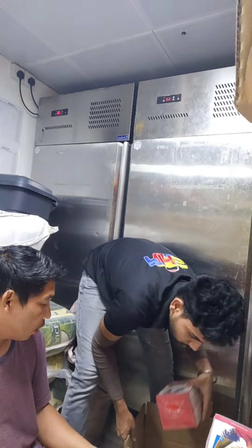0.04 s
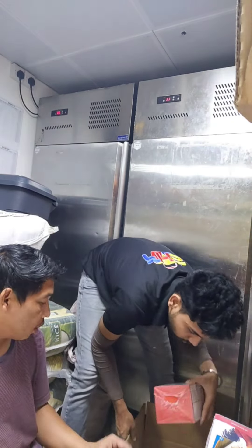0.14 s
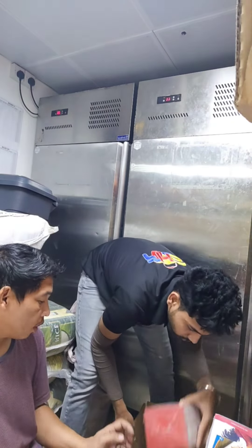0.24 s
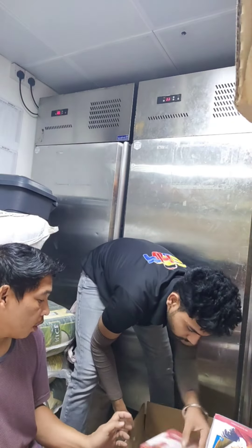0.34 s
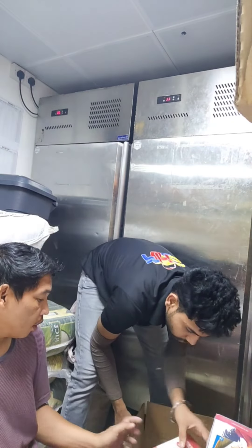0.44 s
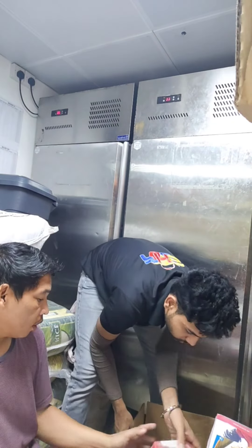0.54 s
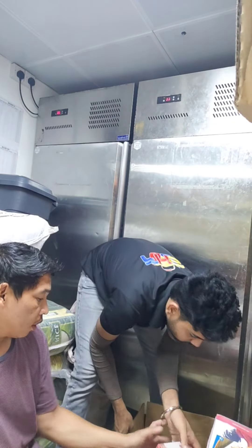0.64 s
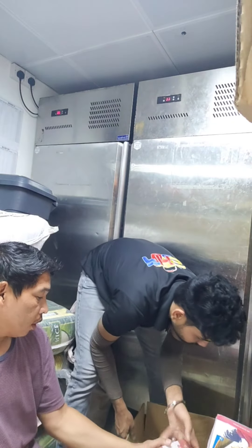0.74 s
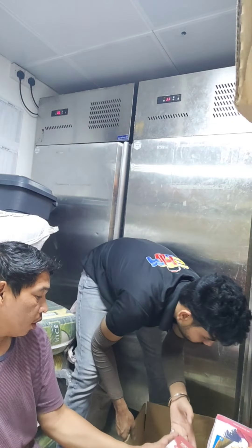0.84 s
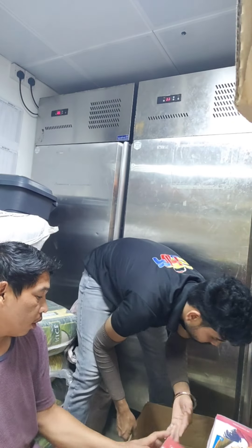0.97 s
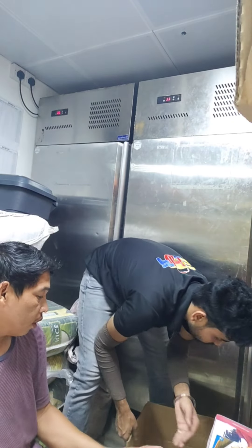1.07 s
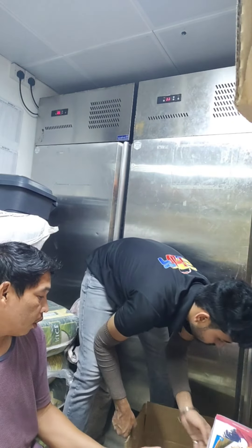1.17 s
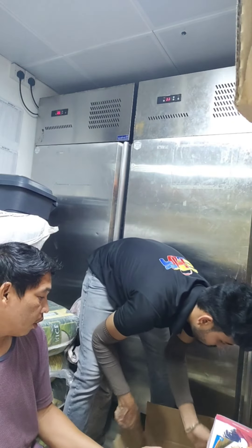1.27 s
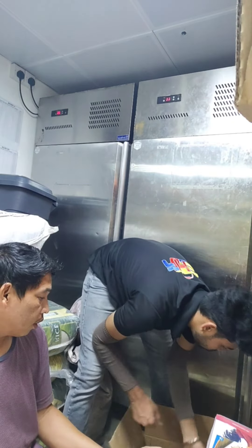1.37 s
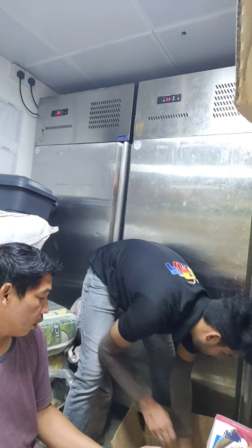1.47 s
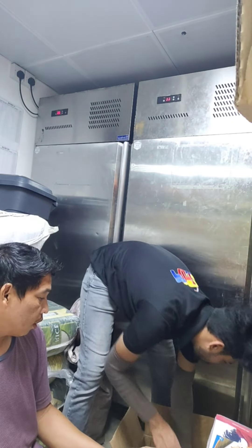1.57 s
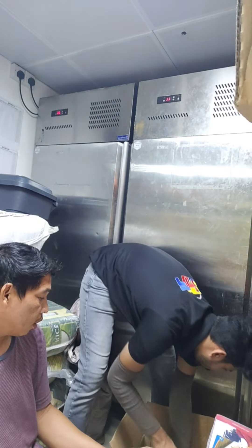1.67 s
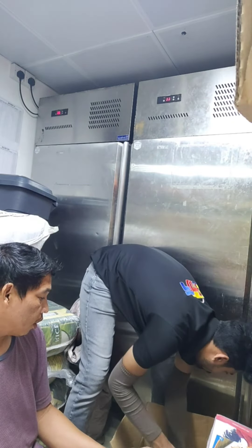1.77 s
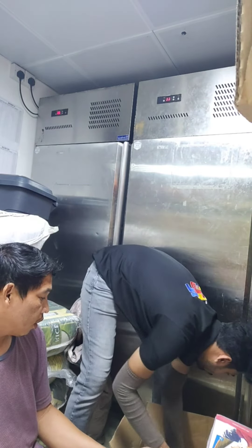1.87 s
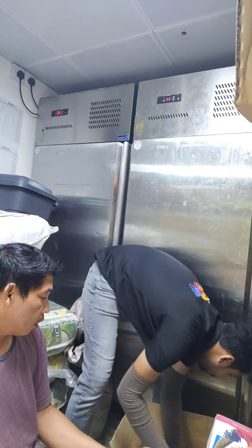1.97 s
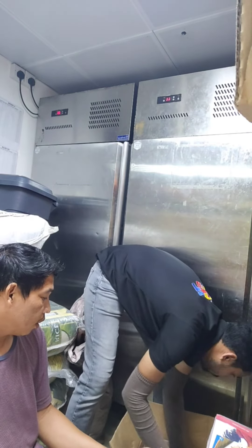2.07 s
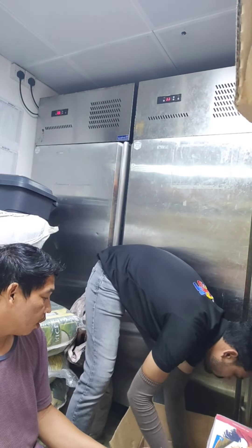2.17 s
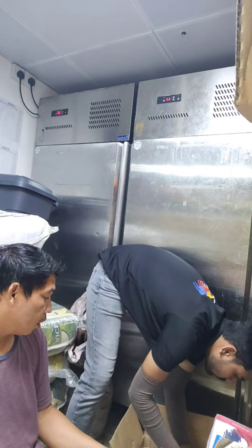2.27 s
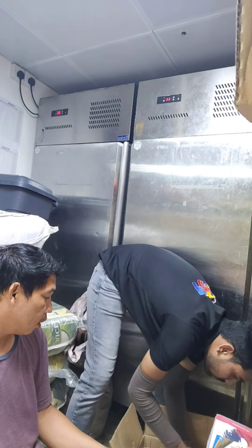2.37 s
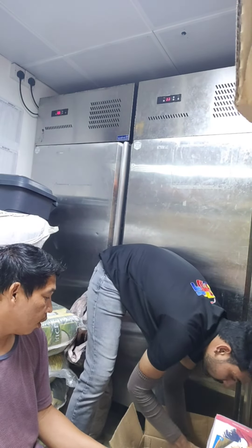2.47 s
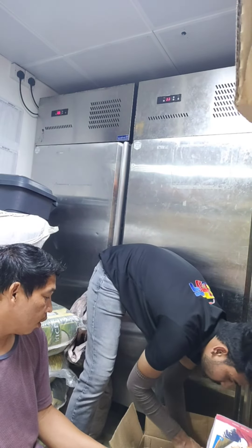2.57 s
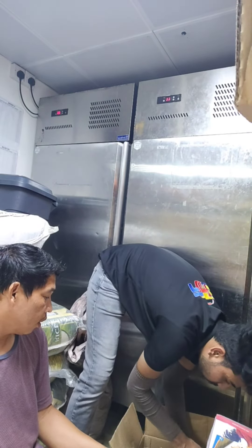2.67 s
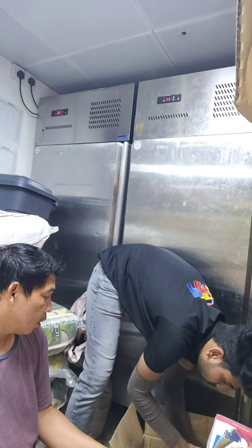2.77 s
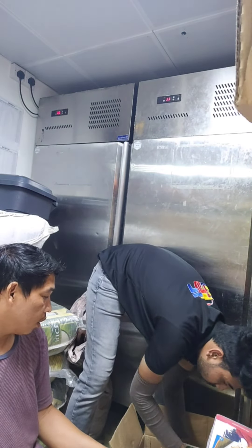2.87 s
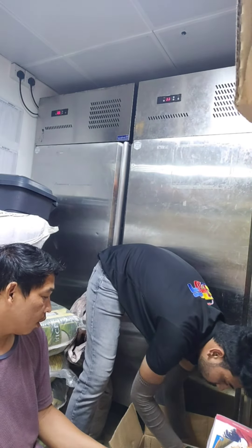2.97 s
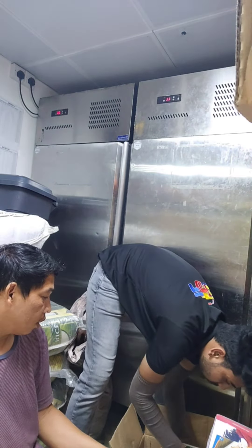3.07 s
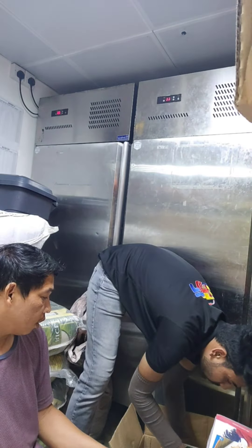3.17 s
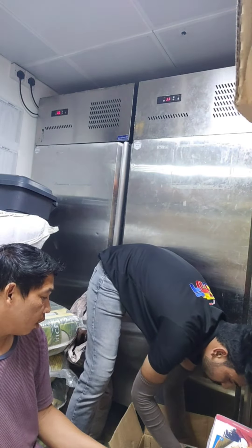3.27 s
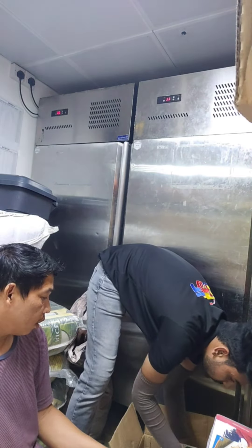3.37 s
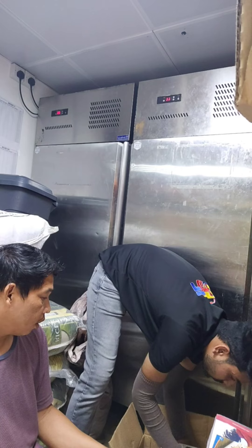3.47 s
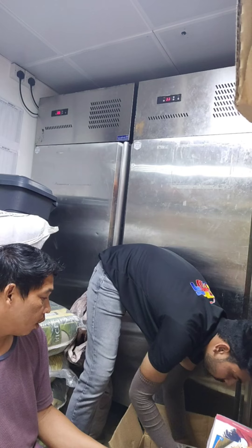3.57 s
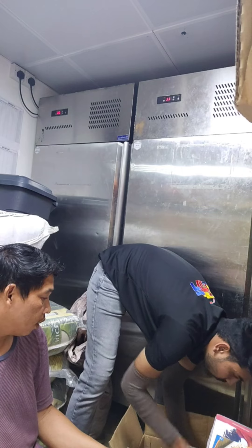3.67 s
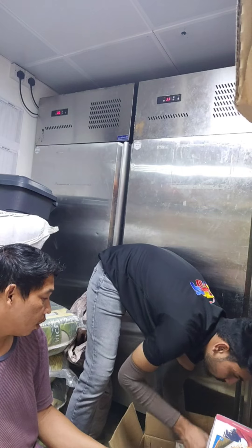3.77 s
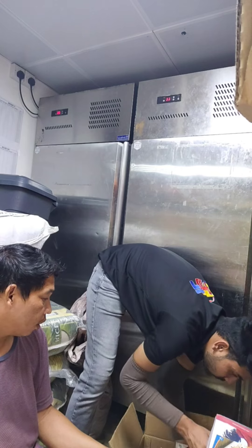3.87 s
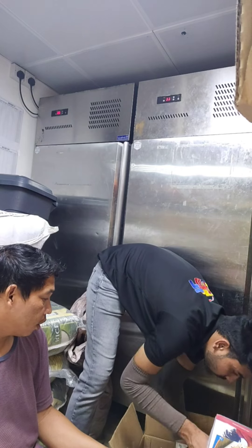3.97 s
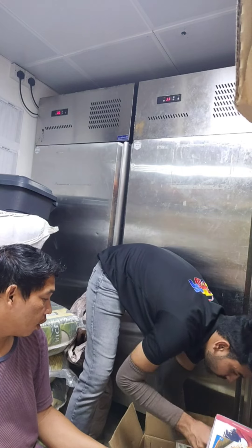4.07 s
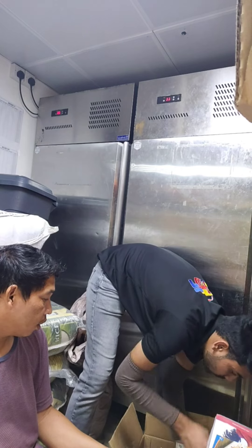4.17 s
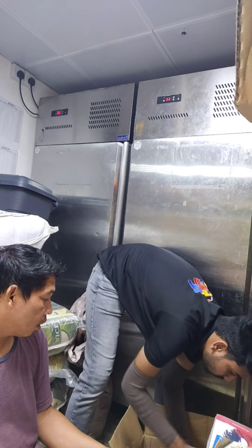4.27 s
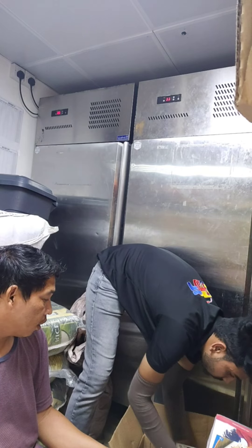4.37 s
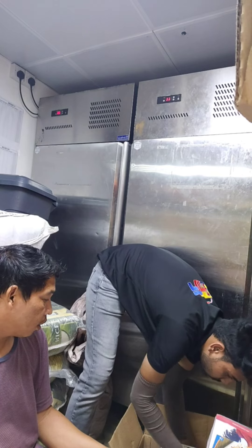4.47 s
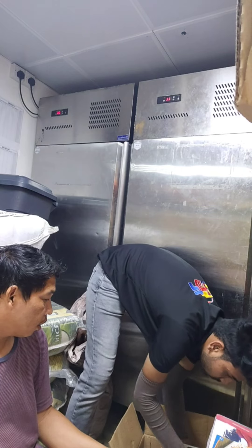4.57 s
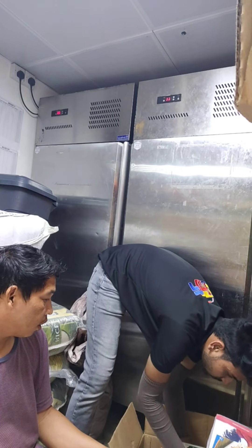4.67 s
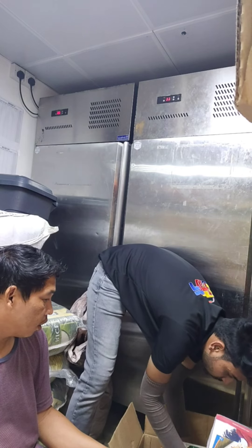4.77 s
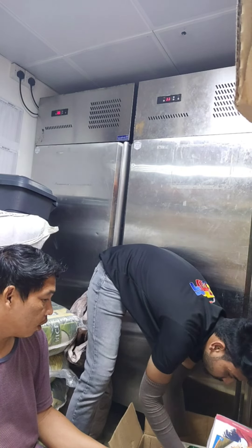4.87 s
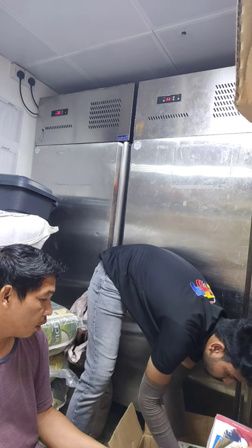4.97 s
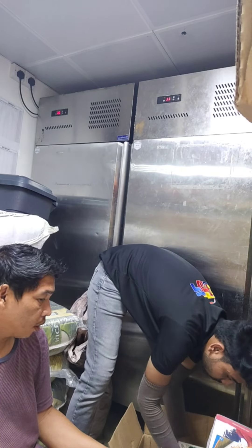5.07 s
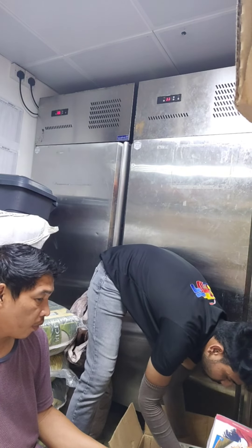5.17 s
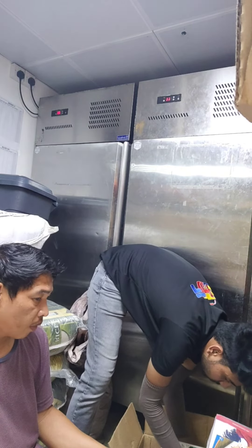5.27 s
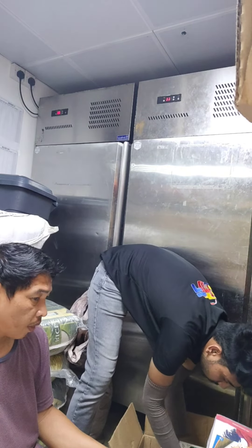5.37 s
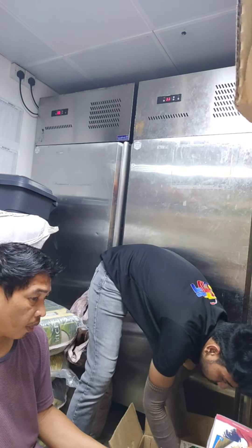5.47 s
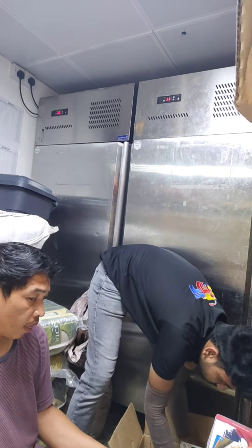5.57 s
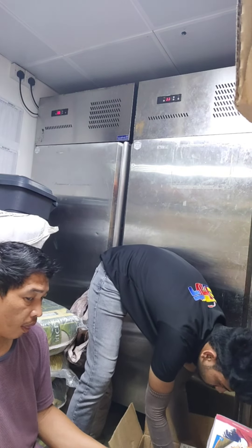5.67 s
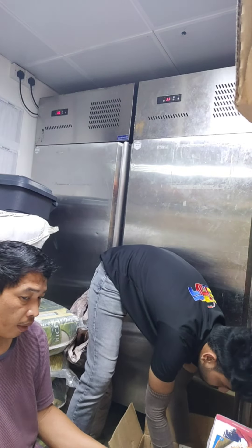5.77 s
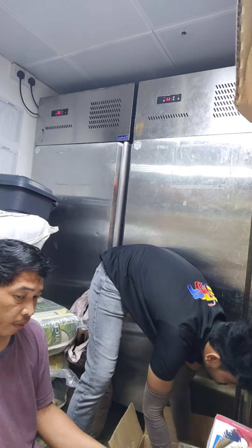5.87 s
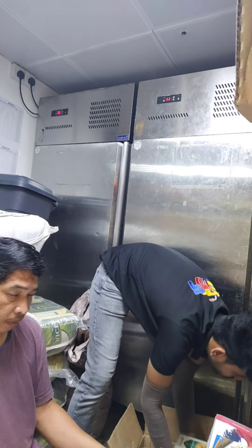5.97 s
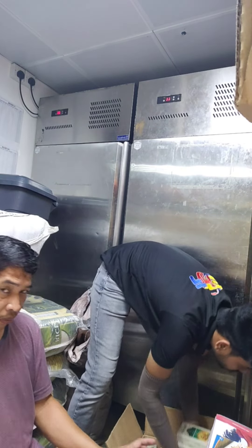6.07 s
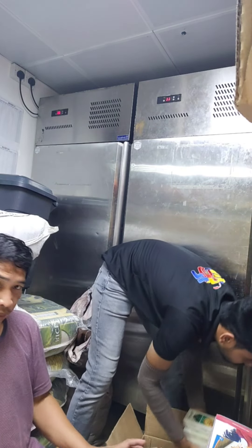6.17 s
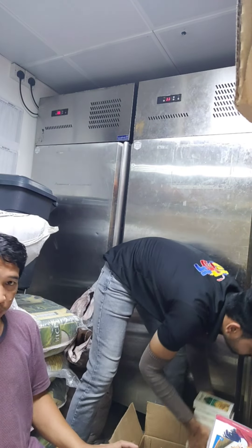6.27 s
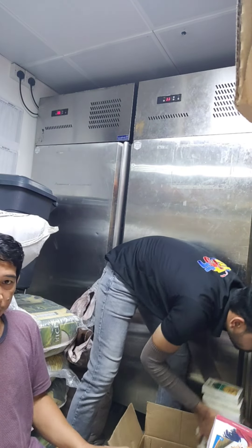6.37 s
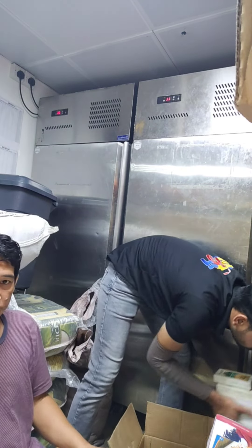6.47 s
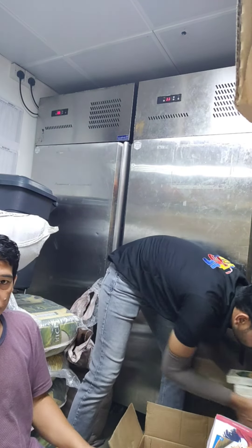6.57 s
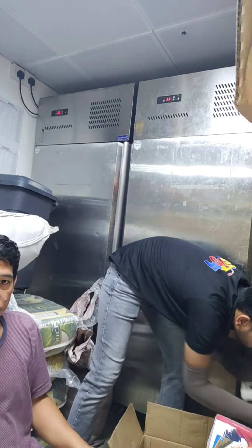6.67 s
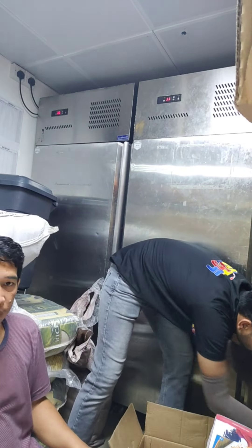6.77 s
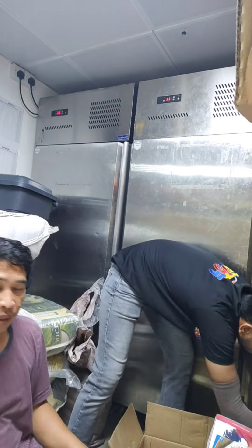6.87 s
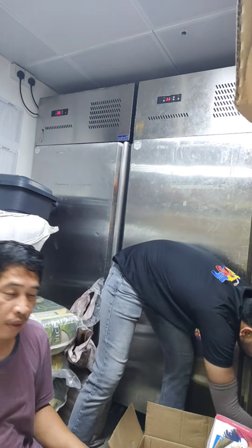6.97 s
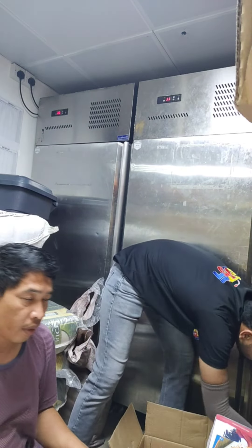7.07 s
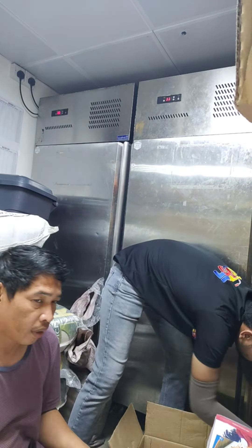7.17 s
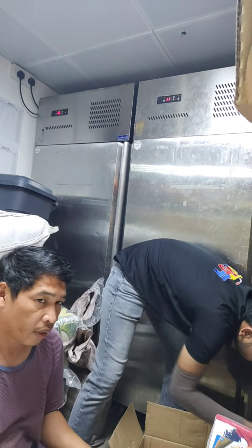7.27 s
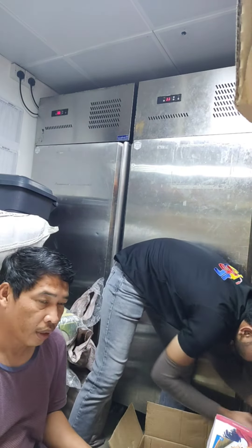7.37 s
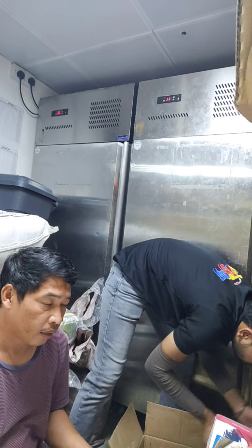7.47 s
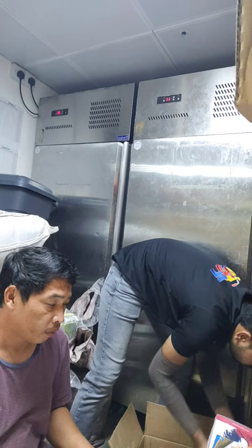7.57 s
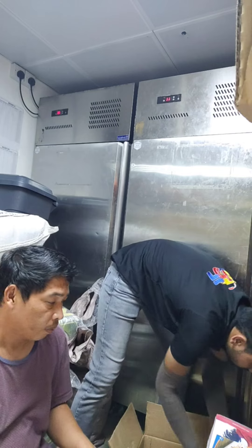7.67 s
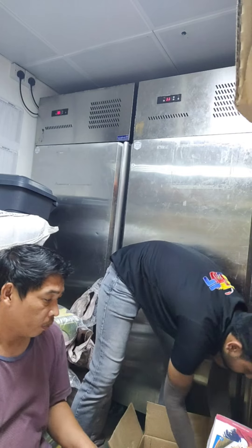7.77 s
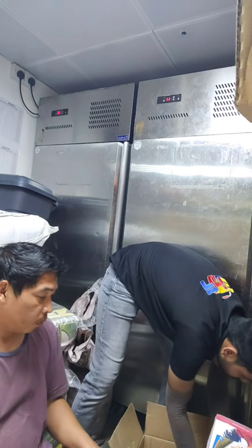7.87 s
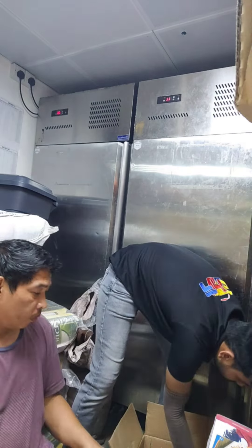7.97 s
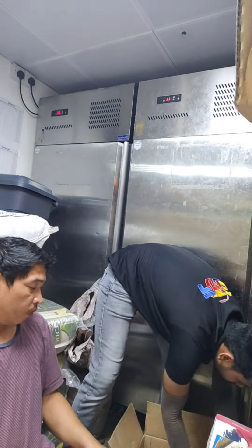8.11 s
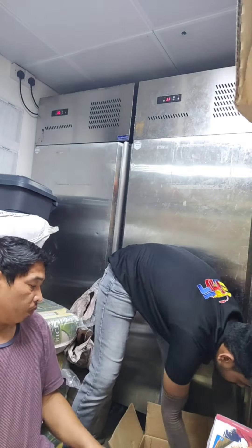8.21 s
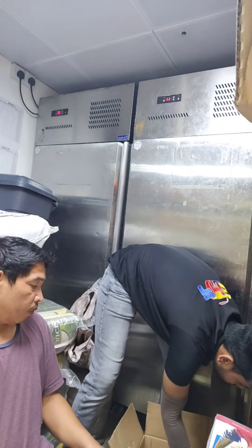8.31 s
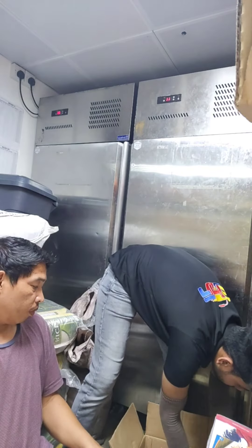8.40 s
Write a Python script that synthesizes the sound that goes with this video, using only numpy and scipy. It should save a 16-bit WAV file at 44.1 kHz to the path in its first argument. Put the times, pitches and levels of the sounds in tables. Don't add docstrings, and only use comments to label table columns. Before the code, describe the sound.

Throughout, commercial refrigerators run in a small storeroom: low hum around 100 to 200 Hz, swelling and dipping about every one and a half seconds, soft fan air, and a thin steady whine near 1950 Hz. At 0.36-0.45 s a pack lands in a cardboard carton with three rapid thumps and a crisp scratch. Around 0.9-1.1 s come small crackly touches, a light knock and rustling; at 1.65 s faint lid taps. From 2 to 6 s mostly machinery, with tiny brushes, a hollow plastic pop at 3.5, a dull handling bump at 4.8 and a clearer pop at 5.5. A soft thump at 6.0 leads to the loudest hollow drop at 6.4, more rattling to 6.6, heavy knocks at 7.0, 7.2 and 7.4, lighter ones at 7.7-7.8, then scraping, thumps near 8.25 and a final rustle and pop at 8.4. Close stereo phone, brief boxy reflections.

```python
import sys
import numpy as np
from scipy import signal
from scipy.fft import rfft, irfft, next_fast_len
from scipy.io import wavfile
from scipy.ndimage import uniform_filter1d

SR = 44100
rng = np.random.default_rng(int(sys.argv[2]) if len(sys.argv) > 2 else 0)


def gain_from_db(level_db):
    decades = np.asarray(level_db, float) / 20
    return 10 ** decades


def generate_wav(sig):
    pcm = np.round(np.clip(np.atleast_2d(sig).T, -1, 1) * 32767).astype(np.int16)
    wavfile.write(sys.argv[1], SR, pcm)


N = 372204
T = np.arange(N) / SR


def colour(x, points):
    hz, db = np.transpose(points)
    size = next_fast_len(len(x))
    f = np.fft.rfftfreq(size, 1 / SR) + 1
    gain = gain_from_db(np.interp(np.log(f), np.log(hz), db, db[0] - 15, db[-1] - 36))
    y = irfft(rfft(x, size) * gain, size)[:len(x)]
    return y / np.std(y)


def ring(x, hz, t60):
    pole = np.exp(2j * np.pi * hz / SR - np.log(1000) / (max(t60, .0002) * SR))
    return signal.lfilter([1], [1, -pole], x).imag


def walk(rate):
    k = int(SR / rate)
    held = np.repeat(rng.standard_normal(N // k + 1), k)
    return 1.3 * uniform_filter1d(uniform_filter1d(held, k), k)[:N]


def grit(size, spread_db):
    catch = np.minimum(rng.exponential(size=size), 6)
    return rng.standard_normal(size) * gain_from_db(spread_db * catch)


def add(out, s, x, db):
    i = int(s * SR)
    x = x[:N - i]
    out[i:i + len(x)] += x * gain_from_db(db) / np.max(np.abs(x))


def taps(table, push):
    out = np.zeros(N)
    for s, db, hz, t60 in table:
        blow = np.zeros(SR // 4)
        size = int(push * SR / hz) + 2
        blow[:size] = np.hanning(size)
        add(out, s, ring(blow, hz, t60), db)
    return out


def strokes(table, column):
    depth_db = 20
    out = np.zeros(N)
    for row in table:
        s, rise, fall = row[:3]
        near = slice(max(int((s - 2 * rise) * SR), 0), int((s + 2 * fall) * SR))
        before = (s - T[near]) / max(rise, .002)
        after = (T[near] - s) / max(fall, .002)
        out[near] += gain_from_db(row[column] - depth_db * np.maximum(before, after))
    return out


def knocks():
    # start in seconds, peak level in dB, panel pitch in Hz, crack in dB
    # relative to 11 dB above the panel, left minus right in dB.
    carton_blows = [(0.36, -31, 362, -5, 1), (0.404, -26, 227, -15, 3), (0.433, -23.5, 355, -16, -2),
                    (0.894, -40, 264, 3.5, 0), (1.113, -31, 354, -14, 2), (6.27, -34, 470, -16, -2),
                    (6.292, -33, 540, -20, -3), (6.386, -13.5, 800, -15, -5), (6.471, -30.5, 327, -24, 0.5),
                    (6.548, -48, 272, -29, -3), (6.56, -24.5, 287, -23, -1), (6.601, -30.5, 550, -9, 0.5),
                    (6.936, -34.5, 227, -17, 1), (6.976, -32, 263, -24, -1), (7.012, -16, 404, -27, 0.5),
                    (7.172, -29, 320, -22, 0), (7.15, -37, 520, -18, 0), (6.997, -26, 550, -22, -1),
                    (6.228, -36, 670, -15, -2), (7.209, -23, 815, -30, -3), (7.241, -28, 230, -26, -3),
                    (7.363, -21, 660, -22, -0.5), (7.687, -31, 386, -21, 0), (7.778, -28.5, 328, -16, 1),
                    (8.03, -35, 287, -15, -0.5), (8.092, -32, 460, -18, -1), (8.268, -27, 293, -36, 0)]
    lid_blows = [(0.949, -35, 945, -8, -6), (1.621, -33.5, 820, -23.5, -5), (1.634, -39, 760, -18, -2),
                 (1.653, -44, 810, -16, 0.0), (1.724, -37.5, 1000, -14, -2), (5.2, -50, 964, -9, -8),
                 (6.393, -22, 900, -11, -6), (6.402, -47, 818, -12, -2), (7.021, -22.5, 810, -7, -1),
                 (7.368, -29.5, 950, -4, -2), (6.559, -31, 1039, -5.5, -5), (6.519, -30.5, 1380, -7, 2),
                 (7.781, -36, 1030, -20, -2)]
    # pitch ratio, level in dB.
    panel_ratios = [(1.005, -1), (0.62, -19), (1.225, -4.5), (1.9, -16)]
    # frequency in Hz, level in dB per Hz.
    crack_spectrum = [(1000, 5), (1600, 8.5), (2200, -0.5), (4500, -7.5), (8300, -24.5), (15000, -24)]
    soft_db, soft_rattle_s = -44, 0.018
    hard_db, hard_rattle_s = -9, 0.0076
    out, t = np.zeros((2, N)), T[:6000]
    for s, db, hz, crack_db, pan_db in carton_blows + lid_blows:
        rattle_s = np.interp(db, [soft_db, hard_db], [soft_rattle_s, hard_rattle_s])
        contact = grit(len(t), 4.84) * np.exp(-t / rattle_s)
        contact[20] = 2.4 * np.max(np.abs(contact))
        panel = sum(gain_from_db(g) * ring(contact, hz * ratio, 22 / hz) for ratio, g in panel_ratios)
        for side, sign in zip(out, (1, -1)):
            side_db = db + sign * pan_db / 2
            add(side, s, panel, side_db)
            crack = colour(contact * rng.standard_normal(len(t)), crack_spectrum)
            add(side, s, crack, side_db + crack_db + 11.0)
    return out


def tubs():
    # start in seconds, peak level in dB, pitch in Hz, t60 in seconds.
    ticks = [
        (1.004, -53, 6550, .07),
        (5.148, -47, 2200, .04),
    ]
    pops = [
        (3.542, -37.5, 820, 0.056),
        (5.105, -39, 806, 0.041),
        (5.539, -32.5, 837, 0.05),
        (5.541, -41, 605, .03),
        (7.687, -39, 700, .015),
        (7.374, -23, 973, 0.054),
        (8.175, -41, 1070, 0.028),
        (8.411, -35, 820, 0.032),
    ]
    bodies = [(6.387, -17, 764, 0.036), (6.393, -24, 942, .05), (6.401, -23.5, 524, .05),
              (6.561, -23, 880, .03), (6.561, -24, 436, 0.052), (6.567, -27, 520, 0.035),
              (7.0125, -14.5, 480, 0.021), (7.366, -27, 420, .1), (7.365, -31, 1300, .03),
              (7.364, -20, 680, .06), (7.019, -24, 580, 0.061), (7.025, -21, 680, .05),
              (6.392, -18, 497, 0.081), (7.013, -17, 560, .05), (7.369, -29, 800, 0.047),
              (6.562, -24, 690, 0.06), (8.24, -28.5, 295, 0.07)]
    return taps(ticks, 0.94) + taps(pops + bodies, 0.76)


def thumps():
    # start in seconds, peak level in dB, pitch in Hz, t60 in seconds.
    landings = [(0.358, -23, 190, 0.17), (0.411, -21, 193, 0.075), (0.439, -21.5, 143, 0.038),
                (1.117, -30, 195, 0.045), (5.999, -28, 187, 0.084), (6.386, -28, 250, 0.03),
                (6.402, -27, 255, 0.07), (6.545, -22, 261, 0.11), (6.979, -25, 250, 0.06),
                (7.017, -26, 148, 0.07), (7.238, -17, 205, 0.023), (8.235, -22.5, 145, 0.084),
                (8.267, -26, 178, 0.039)]
    return taps(landings, 0.25)


def rubbing():
    # hardest moment in seconds, rise in seconds, fall in seconds,
    # scratch level in dB, box boom level in dB.
    slides = [(0.364, 0.011, 0.04, -37.5, -30), (0.412, .012, 0.049, -45, -35.5),
              (0.442, 0.02, 0.055, -45.5, -36.5), (0.896, 0.053, 0.03, -43, -52),
              (1.122, 0.027, .05, -64, -49), (1.65, 0.062, 0.087, -62, -42), (1.722, 0.11, 0.04, -58, -44),
              (4.412, 0.11, .05, -63, -49), (5.36, .06, .1, -57, -53), (6.298, 0.1, 0.027, -48, -36),
              (6.392, 0.0088, 0.035, -31, -26), (6.52, .008, 0.026, -41.5, -31.5),
              (6.566, 0.023, 0.033, -44.5, -29.5), (6.607, .015, 0.047, -45.5, -37),
              (6.981, 0.024, 0.1, -48, -38), (7.014, 0.013, 0.04, -35, -24),
              (7.178, 0.064, 0.014, -52, -35.5), (7.24, 0.045, 0.06, -54, -35.5),
              (7.368, 0.0062, 0.057, -43, -34), (7.47, 0.037, .06, -54, -47),
              (7.784, 0.037, 0.064, -50.5, -34), (8.118, 0.21, 0.037, -56, -41.5)]
    rustles = [
        (0.955, .04, 0.039, -49.5, -44),
        (1.09, 0.33, 0.14, -57, -42),
        (1.7, .15, 0.17, -63, -62),
        (3.23, .1, 0.11, -64, -48.5),
        (3.74, .15, .2, -63, -67),
        (4.382, 0.061, 0.086, -64, -49),
        (7.222, 0.027, 0.069, -58, -48),
        (8.4, 0.027, 0.023, -45.5, -41),
    ]
    # frequency in Hz, level in dB per Hz.
    scratch_spectrum = [(900, 1), (1900, -19), (2700, 7.5), (4500, 3.5), (6500, -10.5), (8500, -43)]
    crackle_spectrum = [(5000, 1.5), (8000, -3.5), (12000, -3), (16000, -19)]
    boom_spectrum = [(90, 7), (200, 8), (450, 5.5), (1000, -4), (1700, -13), (2500, -9.5)]
    slide_crackle_db, rustle_crackle_db = -14.5, -3
    fibres = grit((2, N), 2.5) * gain_from_db(1.5 * walk(150))
    slide, rustle = strokes(slides, column=3), strokes(rustles, column=3)
    crackle = gain_from_db(slide_crackle_db) * slide + gain_from_db(rustle_crackle_db) * rustle
    wide = np.array([colour(x, scratch_spectrum) * (slide + rustle) + colour(x, crackle_spectrum) * crackle
                     for x in fibres])
    return wide + colour(fibres[0], boom_spectrum) * strokes(slides + rustles, column=4)


def brushes():
    # peak time in seconds, peak level in dB, centre in Hz, width in Hz, length in seconds.
    touches = [(2.402, -40, 1000, 1300, .003), (5.362, -39, 925, 500, 0.019), (5.403, -43, 850, 600, 0.011),
               (0.409, -33, 2570, 1400, 0.0047), (0.44, -35, 4700, 1500, .003),
               (0.45, -42, 4200, 1500, 0.0047), (0.374, -33, 3600, 2500, .005),
               (0.877, -40, 3700, 2500, 0.0035), (0.944, -36, 4800, 3000, .003),
               (0.963, -35, 4500, 1500, .004), (6.251, -39.5, 3200, 1000, 0.0058),
               (6.293, -37, 3000, 1500, .006), (6.4, -30, 4400, 1500, .003), (6.98, -38, 4500, 3000, .005),
               (7.012, -34, 4800, 3500, .003), (7.052, -34, 3000, 3000, 0.0067),
               (7.155, -42, 2900, 2000, .003), (7.175, -39, 2500, 1200, 0.0076),
               (7.232, -40, 4800, 1200, .008), (7.395, -43, 4000, 2500, 0.0057),
               (2.429, -44, 3600, 1500, 0.012), (4.481, -41, 3500, 2200, 0.005),
               (4.812, -41, 2820, 1200, 0.011), (4.95, -45, 2700, 1000, 0.0035),
               (5.146, -41, 3400, 2200, 0.007), (6.022, -36.5, 3180, 700, 0.0041),
               (7.874, -46, 8000, 9000, 0.0053), (0.9, -33.5, 4500, 1100, 0.006),
               (0.956, -43, 4540, 2200, 0.019), (0.364, -22.5, 4200, 3000, 0.0031),
               (6.522, -32.5, 4600, 3000, 0.0025), (6.528, -38, 1500, 900, .005),
               (6.606, -38, 1200, 900, 0.0042)]
    pan_db = -3
    out, t = np.zeros((2, N)), T[:4000]
    for s, db, hz, width, length in touches:
        t60 = 1.5 / width
        for side, sign in zip(out, (1, -1)):
            puff = grit(len(t), 2.3) * t / length * np.exp(-t / length)
            add(side, s - length, ring(ring(puff, hz, t60), hz, t60), db + sign * pan_db / 2)
    return out


def bumps():
    # start in seconds, peak level in dB, pitch in Hz, t60 in seconds.
    shifts = [
        (4.777, -36, 90, 0.11),
        (1.125, -39, 95, 0.23),
    ]
    return taps(shifts, .5)


def room(x):
    t60_s = 0.13
    t = T[:SR // 3]
    decay = np.exp(-np.log(1000) * t / t60_s) * (t > .002)
    common, own = rng.standard_normal((2, len(t))) * decay
    own = signal.sosfilt(signal.butter(2, 600, "high", fs=SR, output="sos"), own)
    tails = np.array([common + own, common - own]) / np.sqrt(2 * np.sum(common ** 2))
    return signal.fftconvolve(x, tails, axes=1)[:, :N]


def shaft_angle():
    shaft_hz, shaft_sag = 48.738, 2.2e-4
    hunt_hz, hunt_top_s, hunt_rad = 2.596, 3.59, .0145
    sag = shaft_sag * (T - 3.6) ** 2 * np.where(T > 3.6, 20, 10)
    hunting = hunt_rad * np.cos(2 * np.pi * hunt_hz * (T - hunt_top_s))
    return 2 * np.pi * shaft_hz * T + hunting - sag


def compressor(angle):
    # multiple of shaft rate,
    # left in dB, right in dB, lead of left in radians.
    shell = [(3, -47.8, -47.6, -0.03), (14, -58.0, -61.6, -1.06), (33, -70.2, -68.9, -2.14),
             (34, -66.7, -71.1, -2.01), (35, -70.0, -70.7, 3.08), (37, -51.8, -62.3, 2.35),
             (38, -66.5, -64.6, 1.22), (39, -63.9, -61.8, 2.78), (40, -39.4, -44.9, 3.01),
             (41, -63.1, -61.3, 1.42), (42, -58.2, -61.8, -2.94), (44, -61.4, -68.9, 2.87),
             (50, -66.1, -71.1, 2.14), (52, -72.8, -74.7, -2.84), (53, -74, -77, -0.61),
             (54, -81, -71.0, -2.13), (55, -69.0, -66.8, 1.96), (56, -72.2, -67.4, -0.66),
             (57, -70.9, -68.0, 2.96), (59, -73, -84, 1.46), (62, -64.0, -73.8, 3.09),
             (64, -67.0, -62.1, 2.27), (65, -66.8, -70.1, -2.95), (76, -75.7, -75.3, 2.42),
             (77, -75.2, -77.8, 2.84), (92, -80, -76, -1.7), (94, -76.7, -74.0, 0.77),
             (112, -71.2, -78.1, -2.95), (114, -76.4, -83.5, -1.41), (132, -77, -87, 2.18),
             (30, -81.7, -71.6, -2.28), (32, -73.5, -75.4, -1.44), (36, -68.5, -78.1, 1.77),
            (48, -79.7, -78.5, -2.52), (49, -73.7, -84.6, -0.8), (51, -75.3, -76.2, 0.27),
            (58, -76.8, -76.8, 2.97), (60, -83.5, -74.4, -1.2), (61, -79.2, -72.2, 1.26),
            (67, -81.3, -88.6, 2.8), (70, -82.0, -79.5, -2.55), (71, -80.9, -82.4, 2.86),
            (82, -87.2, -79.7, 0.09), (83, -87.6, -80.7, 2.96), (86, -93.4, -79.4, -1.58),
            (89, -83.1, -79.8, -0.43), (91, -78.1, -80.6, -1.61), (93, -86.2, -78.1, -1.02),
            (97, -87.2, -78.9, 0.07), (98, -77.6, -80.7, -0.58), (100, -84.1, -79.5, -1.83),
            (101, -81.3, -87.0, 1.68), (115, -81.2, -79.5, -2.9), (131, -81.8, -93.0, 1.58)]
    # multiple of shaft rate, left in dB, right in dB.
    faint = [(30, -78, -78), (62, -79, -79), (68, -88, -88), (100, -85, -82), (116, -86, -88),
             (135, -92, -97), (200, -99, -104), (260, -100, -103)]
    faint_spread_db = 4
    turn = np.linspace(0, 2 * np.pi, num=16385)
    order, left_db, right_db, lead = np.transpose(shell)[:, :, None]
    phase = order * turn + rng.uniform(0, 2 * np.pi, order.shape)
    left = np.sum(gain_from_db(left_db) * np.sin(phase + lead), axis=0)
    right = np.sum(gain_from_db(right_db) * np.sin(phase), axis=0)
    comb = np.setdiff1d(np.arange(30, 260), order)[:, None]
    faint_order, *faint_levels = np.transpose(faint)
    out = []
    for shape, trend_db in zip((left, right), faint_levels):
        comb_db = np.interp(comb, faint_order, trend_db) + faint_spread_db * rng.standard_normal(comb.shape)
        comb_phase = comb * turn + rng.uniform(0, 2 * np.pi, comb.shape)
        shape = shape + np.sum(gain_from_db(comb_db) * np.sin(comb_phase), axis=0)
        out.append(np.interp(angle % (2 * np.pi), turn, shape))
    sway = gain_from_db(.6 * walk(2) + .3 * np.array([walk(2), walk(2)]))
    return np.sqrt(2) * sway * out


def hum():
    # frequency in Hz, level in dB.
    lines = [(200.15, -46.5), (99.73, -55.5), (119.65, -66), (279.0, -64), (46.21, -77), (598.5, -69),
             (719, -74), (759, -72), (1075, -77)]
    beat_nulls = [-.65, .9, 2.55, 4.03, 5.58, 6.9, 8.3, 9.7]
    rival_db = -47
    behind = np.interp(T, beat_nulls, np.arange(len(beat_nulls)))
    rival = -gain_from_db(rival_db) * np.sin(2 * np.pi * (lines[0][0] * T - behind))
    return np.sqrt(2) * (rival + sum(gain_from_db(db) * np.sin(2 * np.pi * hz * T) for hz, db in lines))


def air(angle):
    # frequency in Hz, level in dB per Hz.
    mid_spectrum = [(30, -85), (60, -28.5), (112, -17), (145, -20.5), (185, -13), (250, -12), (335, -18),
                    (440, -18.5), (560, -27), (850, -31.5), (1200, -38), (1600, -34.5), (2280, -36.5),
                    (2700, -34.5), (3400, -42.5), (4800, -40.5), (7800, -69)]
    side_spectrum = [(60, -44), (150, -21), (250, -9.5), (500, -14), (800, -13.5), (1200, -20),
                     (1600, -8.5), (2000, -12), (2300, -14.5), (3100, -18), (3600, -21.5), (5200, -21),
                     (6000, -28), (8000, -42)]
    # frequency in Hz, left minus right in dB.
    lean_points = [(200, 1), (800, -3), (1400, -1), (2000, 1), (2700, 1), (3300, 2), (5000, -1), (7000, 5),
                   (9000, 2), (14000, 0)]
    # frequency in Hz, width in Hz, left in dB, right in dB.
    ducts = [(668, 26, -57.5, -60), (1438.5, 10, -82, -60), (858, 84, -66.5, -68.5), (7110, 210, -71, -100),
             (101.8, 6, -59, -59), (193.8, 7.5, -54.5, -52), (396, 38, -58.5, -63.5),
             (1892, 92, -57.5, -66.5), (5000, 380, -71, -67), (5580, 44, -73.5, -82),
             (6380, 81, -70.5, -93), (10500, 660, -76.5, -109), (3110, 43, -69, -65)]
    mid_db, side_db = -46, -54
    mid = gain_from_db(mid_db) * colour(rng.standard_normal(N), mid_spectrum)
    side = gain_from_db(side_db) * colour(rng.standard_normal(N), side_spectrum)
    size = next_fast_len(N)
    octaves = np.log2(np.fft.rfftfreq(size, 1 / SR) + 1)
    lean_hz, lean_db = np.transpose(lean_points)
    lean = gain_from_db(np.interp(octaves, np.log2(lean_hz), lean_db) / 2)
    both = rfft([mid + side, mid - side], size) * [lean, 1 / lean]
    out = 0
    for octave in range(4, 15):
        band = irfft(both * np.clip(1 - np.abs(octaves - octave), 0, 1), size)[:, :N]
        puff = 1 + (.25 if octave > 11 else 0) * np.cos(angle)
        out = out + band * puff * gain_from_db(.5 * walk(1.42) + 0.17 * walk(5.1))
    for hz, width, left_db, right_db in ducts:
        roar = ring(rng.standard_normal(N), hz, 2.2 / width)
        opposed = 1200 < hz < 3500
        sign = [[1], [-1 if opposed else 1]]
        out = out + gain_from_db([[left_db], [right_db]]) * sign * roar / np.std(roar)
    return out


def scene():
    room_db = -8.5
    angle = shaft_angle()
    carton = knocks() + brushes() + rubbing() + tubs() + thumps()
    carton[1] = np.roll(carton[1], 6)
    carton = signal.sosfilt(signal.butter(3, 110, "high", fs=SR, output="sos"), carton)
    machines = compressor(angle) + hum() + air(angle)
    return bumps() + machines + carton + gain_from_db(room_db) * room(carton)


def band_limit(x):
    return signal.sosfilt(signal.butter(12, 15970, fs=SR, output="sos"), x)


def record(dry):
    hiss_db, top_hz = -68, 15520
    hiss_spectrum = [(3000, -3), (8000, -6.5), (14000, -5.0), (16000, -0.5)]  # (Hz, dB per Hz)
    hiss = np.array([colour(x, hiss_spectrum) for x in rng.standard_normal((2, N))])
    dry = signal.sosfilt(signal.butter(3, 42, "high", fs=SR, output="sos"), dry)
    band = signal.ellip(12, .3, 60, top_hz, fs=SR, output="sos")
    heard = signal.sosfilt(band, dry + gain_from_db(hiss_db) * hiss)
    return band_limit(heard)


dry = scene()
out = record(dry)
generate_wav(out)
```